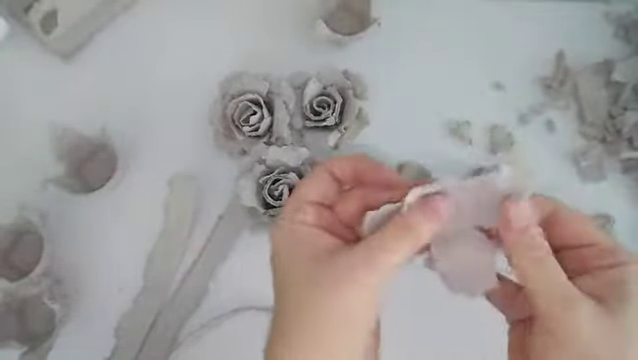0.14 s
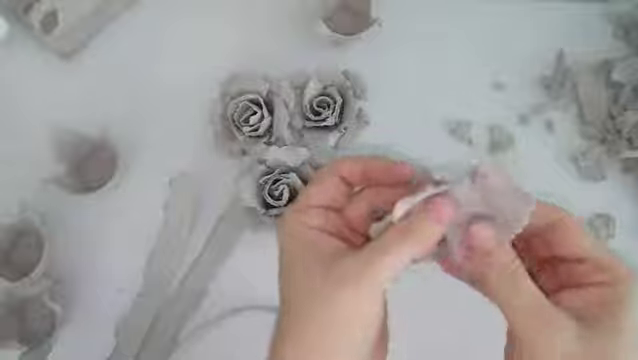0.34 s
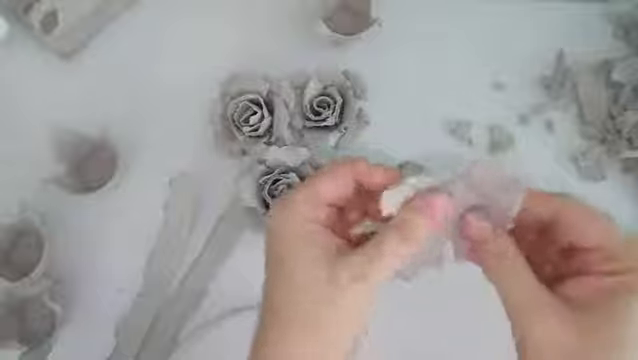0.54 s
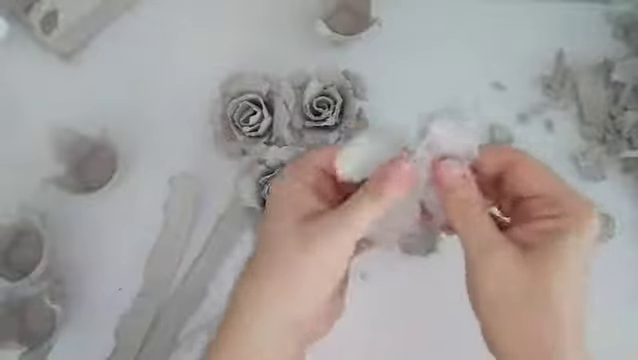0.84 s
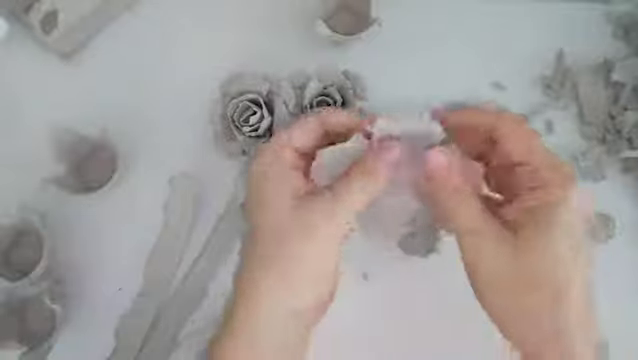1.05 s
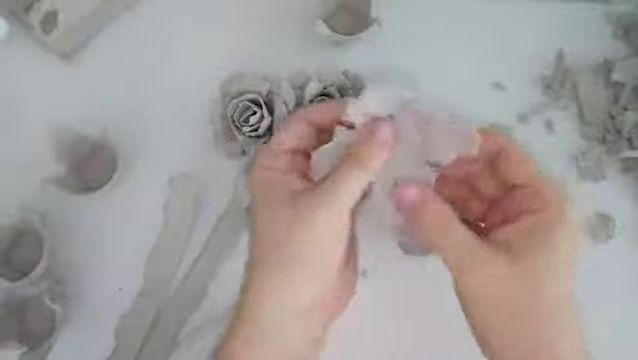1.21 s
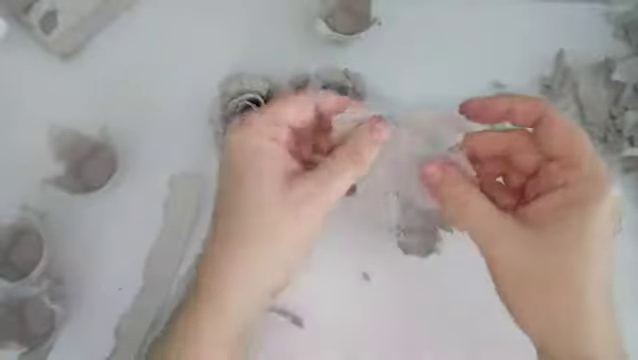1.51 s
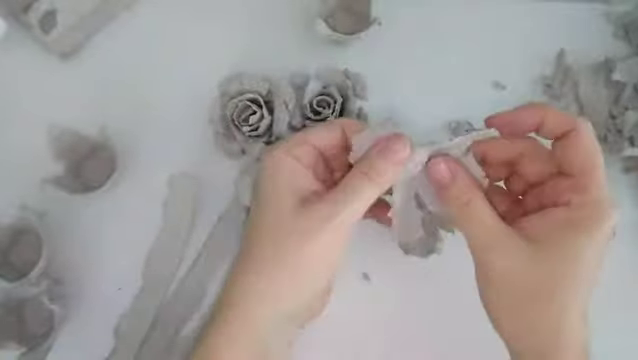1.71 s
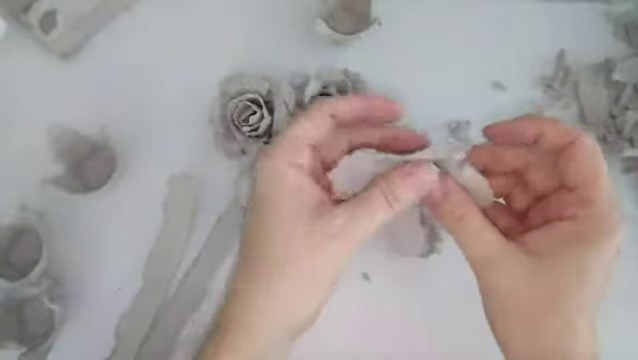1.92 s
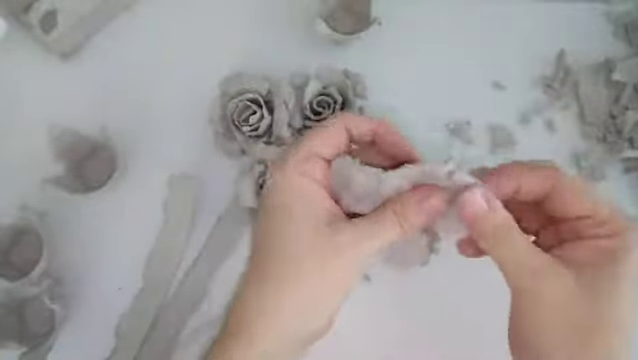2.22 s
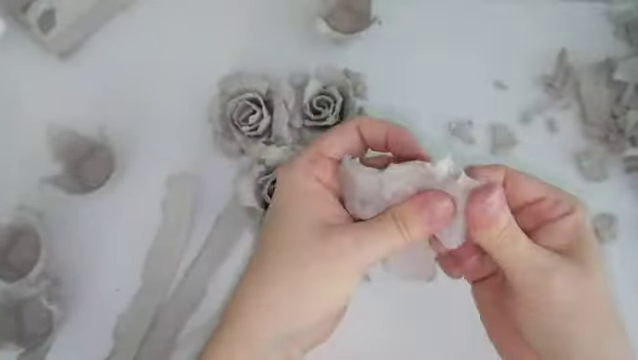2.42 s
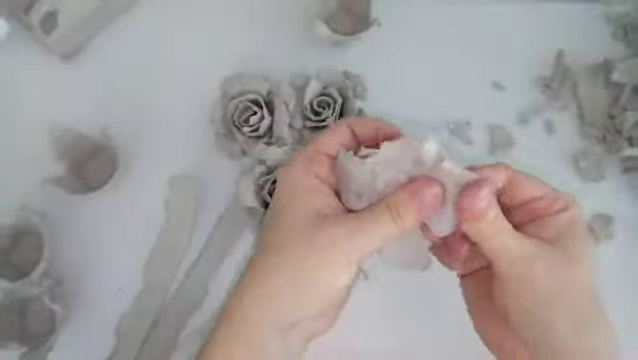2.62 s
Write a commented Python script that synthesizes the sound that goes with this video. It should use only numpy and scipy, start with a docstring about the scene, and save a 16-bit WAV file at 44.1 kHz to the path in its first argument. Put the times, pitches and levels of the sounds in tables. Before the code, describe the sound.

Cardboard rustles and rasps under fingers, close up, with a few tiny snaps.

```python
"""A table in a quiet room, a stereo microphone close to two hands at work.
They bend and smooth a torn piece of moulded egg-carton pulp. Each stroke is a run of tiny fibre slips:
the card rasps, and dry skin hisses over it, mostly on the left. A firm rub makes the cupped card sound
hollow, and now and then a fibre snaps. The hands send soft bumps and a rumble into the microphone."""
import sys
import numpy as np
from scipy import signal
from scipy.fft import rfft, irfft, next_fast_len
from scipy.io import wavfile

SR = 44100
rng = np.random.default_rng(int(sys.argv[2]) if len(sys.argv) > 2 else 0)


def materialize(psi):
    """Save the field psi as 16-bit PCM at rate SR to the path in sys.argv[1].

    A 1-D psi becomes a single channel; in a 2-D psi each row is a channel.
    """
    bounded = np.clip(np.atleast_2d(psi).T, -1, 1)
    quanta = np.round(bounded * 32767).astype(np.int16)
    wavfile.write(sys.argv[1], SR, quanta)


N = 121275
T = np.arange(N) / SR

# Spectrum of the room tone: frequency_hz, level_db
ROOM_TONE_SPECTRUM = [(25, -6), (100, -10), (400, -3), (700, -13.5), (1200, -13.5), (2200, -22),
                      (12000, -28.5), (16000, -37)]
# Handling rumble at the microphone: time_s, left_db, right_db
RUMBLE_LEVELS = [(0, -67, -59.5), (.11, -51.5, -66), (.24, -52, -49.5), (.35, -49.5, -50.5),
                 (.44, -45, -51), (.65, -52.5, -59), (.77, -69, -65), (0.851, -57, -52), (1.1, -48, -47.5),
                 (1.251, -62.5, -51), (1.38, -76, -56), (1.5, -74, -68), (1.79, -60, -62),
                 (1.85, -51.5, -72), (1.921, -46.5, -51.5), (2.04, -76.5, -73.5), (2.3, -77, -86),
                 (2.48, -81, -69.5), (2.7, -79.5, -84)]
# Spectrum of that rumble: frequency_hz, level_db
RUMBLE_SPECTRUM = [(20, -21), (40, -10.5), (62, 3.5), (82, -1.5), (120, -6.5), (160, -10.5), (210, -32),
                   (400, -42), (1000, -54.5)]
# Soft bumps of the hands: peak_s, left_db, right_db, pitch_hz
HAND_BUMPS = [(.154, -29, -56, 88), (.184, -40, -54, 98), (.244, -49, -35, 76), (.306, -34, -42, 80),
              (.986, -53, -39, 66), (1.347, -70, -41, 72), (1.676, -44, -50, 80), (1.869, -41, -60, 100)]
# Hollow notes of the cupped card: peak_s, pitch_hz, level_db
HOLLOW_NOTES = [(.505, 730, -61), (.515, 1370, -57), (.52, 1580, -62), (.665, 1130, -64), (.66, 720, -69),
                (1.66, 910, -71), (1.925, 970, -74)]
# Breaking fibres: start_s, strength_db
FIBRE_SNAPS = [(.499, -31), (.551, -32), (0.711, -30), (.961, -36), (1.080, -18), (1.0812, -25),
               (1.082, -22), (1.0935, -33), (1.3417, -40), (1.842, -42), (1.916, -27), (1.9232, -26),
               (1.925, -27), (1.9585, -33), (1.992, -38.5)]
# Card resonances that a snap rings: pitch_hz, relative_db, t60_s
CARD_MODES = [(2200, -19, .006), (3300, -9, .003), (4600, -12, .004), (6700, -10, .004), (8100, -6, .003),
              (11600, 1.5, .0045), (15200, -1, .002)]
# Spectrum of the card's rasp on the left and on the right: frequency_hz, gain_db
RASP_LEFT_SPECTRUM = [(500, 8), (1200, -1), (2000, 0.5), (3300, -1.5), (4700, -2.5), (7000, -5),
                      (10000, -1.5), (16000, -8)]
RASP_RIGHT_SPECTRUM = [(500, 1), (1200, -3.5), (2400, -33.5), (3200, -7.5), (4200, -6), (5800, 0),
                       (7500, -5.5), (11000, -37), (16000, -21)]
# Spectrum of dry skin sliding on card: frequency_hz, level_db
HISS_SPECTRUM = [(2000, -29.5), (4500, -32), (7000, -9.5), (9200, -5.5), (10300, 1), (11400, 6.5),
                 (12100, 0.5), (13000, -4), (16000, -12.5)]
# Strokes of the hands: peak_s, rise_s, fall_s, rasp_drive_db, hiss_db, lowest_ring_hz
HAND_STROKES = [ (0.021, 0.21, 0.053, -61, -53.5, 2750), (0.117, 0.078, 0.061, -55.5, -45.5, 2630),
                (.202, .005, .04, -68, -56, 2800), (.214, .007, .03, -55.5, -50, 2850),
                (0.245, 0.041, 0.046, -45.5, -35, 2830), (.25, .022, .042, -55, -56, 1820),
                (.30, 0.082, 0.094, -56, -49, 2780), (0.35, 0.037, 0.054, -55, -44.5, 2900),
                (0.448, 0.072, 0.12, -56, -44, 2740), (.479, .02, .089, -40.5, -34, 2185),
                (0.497, 0.033, 0.023, -43.5, -36.5, 2620), (0.518, 0.03, 0.11, -46, -43, 1830),
                (.60, 0.021, 0.087, -51, -50, 1880), (.655, 0.055, 0.1, -48.5, -75, 1980),
                (.71, 0.082, 0.064, -48.5, -36, 1810), (0.764, 0.032, 0.088, -55.5, -51.5, 1875),
                (0.899, 0.075, 0.051, -78, -51.5, 2560), (0.929, 0.059, 0.023, -63, -49, 2600),
                (.968, 0.023, 0.05, -50, -43, 2320), (1.065, 0.073, 0.32, -55.5, -52, 2710),
                (1.129, 0.028, 0.088, -50, -61, 1970), (1.155, 0.054, 0.075, -45, -37, 2830),
                (1.299, 0.011, 0.023, -68, -59.5, 2920), (1.347, 0.015, 0.15, -49.5, -44, 2650),
                (1.407, 0.029, .085, -46, -42, 2480), (1.44, .05, 0.052, -54, -42, 1990),
                (1.617, 0.059, 0.093, -54, -41.5, 2040), (1.702, 0.19, 0.088, -59, -49, 1620),
                (1.867, 0.036, 0.054, -51, -47.5, 2400), (1.897, 0.015, 0.026, -47, -42.5, 2250),
                (1.922, .019, .012, -44, -36, 1900), (1.958, 0.084, 0.063, -55.5, -48.5, 2100),
                (2.064, 0.027, 0.018, -61, -54, 2180), (2.151, 0.097, 0.16, -50, -44.5, 2620),
                (2.21, 0.051, 0.048, -45.5, -56, 2760), (2.297, 0.057, 0.075, -51.5, -49, 2600),
                (2.485, 0.063, 0.058, -81.5, -61.5, 2840), (2.688, 0.0093, 0.049, -57.5, -47.5, 3810), ]

SLIPS_PER_S, CATCHES_PER_S = 5000, 350
GRIP_SHIFTS_PER_S = 9


def from_db(db):
    """Decibels to gain."""
    return 10 ** (np.asarray(db) / 20)


def rms_one(x):
    """Scale to unit power."""
    return x / np.sqrt(np.mean(x ** 2) + 1e-20)


def colour(x, spectrum):
    """Shape by a spectrum of (frequency_hz, gain_db) points."""
    hz, db = np.transpose(spectrum)
    size = next_fast_len(x.shape[-1] + 512)
    bin_hz = np.maximum(np.arange(size // 2 + 1) * SR / size, 1)
    gain = from_db(np.interp(np.log(bin_hz), np.log(hz), db))
    return irfft(rfft(x, size) * gain, size)[..., :x.shape[-1]]


def cut(x, hz, kind, order=2):
    """Butterworth high- or low-pass."""
    return signal.sosfilt(signal.butter(order, hz, kind, fs=SR, output="sos"), x)


def ring(clicks, hz, t60_s):
    """One resonance: a unit click starts a dying sine of height 1."""
    radius, angle = from_db(-60 / (t60_s * SR)), 2 * np.pi * hz / SR
    return signal.lfilter([0, np.sin(angle)], [1, -2 * radius * np.cos(angle), radius ** 2], clicks + 1e-18)


def tail(decay_s, size):
    """Dying noise of unit energy: many close resonances."""
    noise = rng.standard_normal(size) * np.exp(-np.arange(size) / SR / decay_s)
    return noise / np.sqrt(np.sum(noise ** 2))


def room_tone(level_db=-76):
    """The faint, steady noise of the quiet room."""
    left, right, shared = rng.standard_normal((3, N))
    stereo = np.array([left + shared, right - shared])
    return from_db(level_db) * rms_one(colour(stereo, ROOM_TONE_SPECTRUM))


def room_reverb(direct, t60_s=0.066, gain_db=-7):
    """The room returns a short, dull reverberation to each side of the microphone."""
    decay_s = t60_s / np.log(1000)
    wet = [signal.fftconvolve(direct.sum(0), tail(decay_s, size=12000))[:N] for _ in range(2)]
    return from_db(gain_db) * cut(np.array(wet), 6800, "low", order=4)


def handling_rumble():
    """The working hands rumble in the microphone; the upper part arrives in opposite phase."""
    time_s, left_db, right_db = np.transpose(RUMBLE_LEVELS)
    upper = 1.95 * cut(rng.standard_normal(N), 127, "high")
    sides = []
    for level_db, sign in ((left_db, 1), (right_db, -1)):
        rumble = rms_one(colour(rng.standard_normal(N) + sign * upper, RUMBLE_SPECTRUM))
        sides.append(from_db(np.interp(T, time_s, level_db)) * rumble)
    return np.array(sides)


def hand_bumps(width_s=0.0075):
    """Each soft bump of the hands reaches the microphone as a brief low pulse."""
    bumps = np.zeros((2, N))
    for peak_s, left_db, right_db, pitch_hz in HAND_BUMPS:
        swell = np.exp(-0.5 * ((T - peak_s) / width_s) ** 2)
        tone = np.sin(2 * np.pi * (pitch_hz * (T - peak_s) + rng.random()))
        bumps += from_db([[left_db], [right_db]]) * swell * tone
    return bumps


def hand_knock(peak_s=1.675, width_s=0.0091, pitch_hz=314, level_db=-51):
    """One faint, muffled thud from the hands, weaker and inverted on the right."""
    swell = np.exp(-((T - peak_s) / width_s) ** 2)
    thud = from_db(level_db) * swell * np.sin(2 * np.pi * pitch_hz * T)
    return np.array([thud, -0.37 * thud])


def fibre_ticks(size, per_s, spread_db, max_spreads):
    """Fibres let go at random moments, as clicks of uneven strength and either sign."""
    strength_db = spread_db * np.minimum(rng.exponential(1, size), max_spreads)
    heights = from_db(strength_db) * rng.choice([-1, 1], size)
    return rms_one(heights * (rng.random(size) < per_s / SR))


def slips(size):
    """Dense fibre slips and smooth friction noise at equal power."""
    ticks = fibre_ticks(size, SLIPS_PER_S, spread_db=-0.5, max_spreads=5)
    return np.sqrt(0.5) * (ticks + rng.standard_normal(size))


def slips_and_catches(size, catch_share=0.4):
    """Fine slips with the sparser, stronger catches of coarse fibres."""
    catches = fibre_ticks(size, CATCHES_PER_S, spread_db=2.5, max_spreads=3)
    return np.sqrt(1 - catch_share) * slips(size) + np.sqrt(catch_share) * catches


def cupped_card(width_s=0.028, band_ratio=1.12):
    """Under a firm rub, slips briefly excite a low, hollow resonance of the cupped card."""
    hollow = np.zeros(N)
    for peak_s, pitch_hz, level_db in HOLLOW_NOTES:
        tone = ring(slips(N), pitch_hz, t60_s=0.045)
        tone = cut(tone, pitch_hz / band_ratio, "high", order=4)
        tone = cut(tone, pitch_hz * band_ratio, "low", order=4)
        swell = np.exp(-((T - peak_s) / width_s) ** 2)
        hollow += from_db(level_db) * swell * rms_one(tone)
    return np.array([hollow, -0.4 * hollow])


def fibre_snaps():
    """A breaking fibre cracks and rings the card for milliseconds, softer and duller on the right."""
    clicks = np.zeros(N)
    for start_s, strength_db in FIBRE_SNAPS:
        clicks[int(start_s * SR)] = from_db(strength_db)
    # each break trails a quick run of smaller cracks
    tear = clicks + 0.3 * signal.fftconvolve(clicks, tail(decay_s=0.001, size=400))[:N]
    ringing = sum((-1) ** k * from_db(relative_db) * ring(tear, pitch_hz, t60_s)
                  for k, (pitch_hz, relative_db, t60_s) in enumerate(CARD_MODES))
    crack = signal.fftconvolve(clicks, tail(decay_s=0.0008, size=400))[:N]
    left = cut(from_db(-6) * ringing + 0.95 * crack, 2050, "high", order=8)
    right = from_db(-5) * cut(left, 8000, "low", order=4)
    return np.array([left, right])


def shifting_ring(friction):
    """The card's short resonances fade from one set into the next as the fingers slide."""
    size = friction.shape[1]
    grip_position = np.arange(size) / SR * GRIP_SHIFTS_PER_S + rng.random()
    ringing = np.zeros_like(friction)
    for grip in range(int(size / SR * GRIP_SHIFTS_PER_S) + 3):
        fade = np.cos(np.pi / 2 * np.clip(grip_position - grip, -1, 1))
        ringing += fade * signal.fftconvolve(friction, [tail(decay_s=0.0077, size=600)])[:, :size]
    return ringing


def gripped_card(friction, lowest_ring_hz):
    """Friction heard through the gripped card, which radiates little below its lowest ringing."""
    size = friction.shape[1]
    vibration = rms_one(0.66 * friction + 1.9 * shifting_ring(friction))
    steep_edge = signal.cheby1(8, 1, lowest_ring_hz, "high", fs=SR, output="sos")
    body = signal.sosfilt(steep_edge, vibration)
    edge_slips = np.array([slips(size), slips(size)])
    edge_ring = rms_one(ring(edge_slips, 1.05 * lowest_ring_hz, t60_s=0.005))
    edge_ring = cut(edge_ring, 1.2 * lowest_ring_hz, "high")
    leak = cut(vibration, 610, "high")
    return body + from_db(-21) * edge_ring + from_db(-30) * leak


def stroke_swell(peak_s, rise_s, fall_s):
    """A stroke swells and fades: 20 dB down at rise_s before its peak and at fall_s after it."""
    before = np.maximum((peak_s - T) / rise_s, 0) ** 1.66
    after = np.maximum((T - peak_s) / fall_s, 0) ** 1.425
    return from_db(-20 * np.minimum(before + after, 10))


def card_rasp(opposed_share=0.28):
    """Each stroke rasps the card's fibres; a share reaches the two sides in opposite phase."""
    rasp = np.zeros((2, N))
    size = SR // 2
    for peak_s, rise_s, fall_s, drive_db, _, lowest_ring_hz in HAND_STROKES:
        start = int(np.clip(peak_s * SR - size // 2, 0, N - size))
        span = slice(start, start + size)
        shared, left, right = [slips_and_catches(size) for _ in range(3)]
        friction = np.sqrt(opposed_share) * np.array([shared, -shared])
        friction += np.sqrt(1 - opposed_share) * np.array([left, right])
        swell = stroke_swell(peak_s, rise_s, fall_s)[span]
        rasp[:, span] += 2 * from_db(drive_db) * swell * gripped_card(friction, lowest_ring_hz)
    return np.array([colour(rasp[0], RASP_LEFT_SPECTRUM), colour(rasp[1], RASP_RIGHT_SPECTRUM)])


def skin_hiss(brush_db=-64, brush_until_s=2.46, fade_s=0.1, rest_db=-76, right_db=-29):
    """Dry skin hisses with each stroke, brushes the card between strokes and, faintly, at rest."""
    brushing = from_db(brush_db) * np.clip((brush_until_s - T) / fade_s + 1, 0, 1)
    power = brushing ** 2 + from_db(rest_db) ** 2
    for peak_s, rise_s, fall_s, _, hiss_db, _ in HAND_STROKES:
        power += (from_db(hiss_db) * stroke_swell(peak_s, rise_s, fall_s)) ** 2
    left, right = [rms_one(colour(slips(N), HISS_SPECTRUM)) for _ in range(2)]
    return np.sqrt(power) * np.array([left, from_db(right_db) * right])


def hand_strokes(judder_db=1.38, judder_below_hz=87):
    """The rubbing hands judder, shaking the level of rasp and hiss together."""
    rubbing = card_rasp() + skin_hiss()
    judder = rms_one(cut(rng.standard_normal(N), judder_below_hz, "low"))
    return rubbing * from_db(judder_db * judder)


def scene():
    """The card close to the microphone, over handling noise and the quiet room."""
    card = hand_strokes() + cupped_card() + fibre_snaps()
    handling = handling_rumble() + hand_bumps() + hand_knock()
    return room_tone() + room_reverb(card) + handling + card


def record(dry):
    """The treble is cut steeply above 15.9 kHz."""
    return signal.sosfilt(signal.ellip(12, 0.1, 70, 15900, fs=SR, output="sos"), dry)


dry = scene()
out = record(dry)
materialize(out)
```